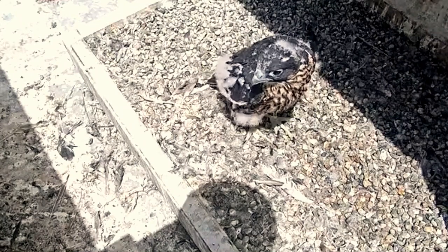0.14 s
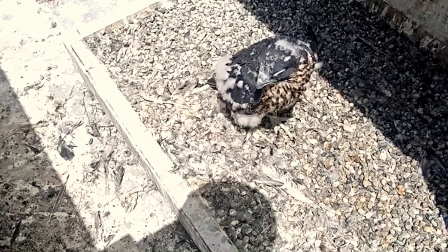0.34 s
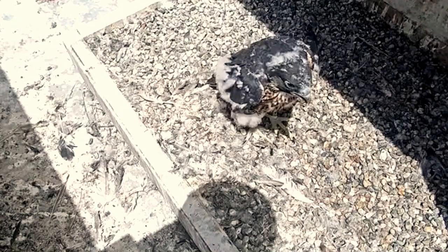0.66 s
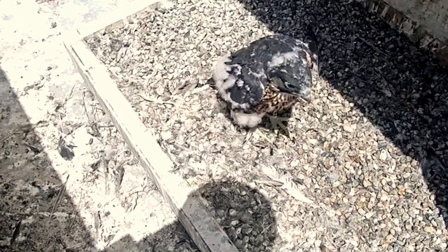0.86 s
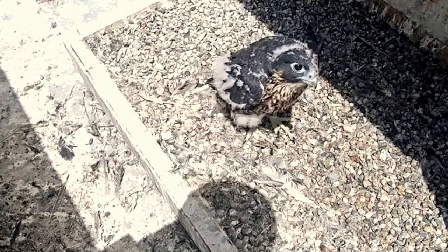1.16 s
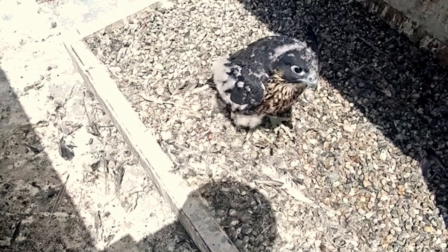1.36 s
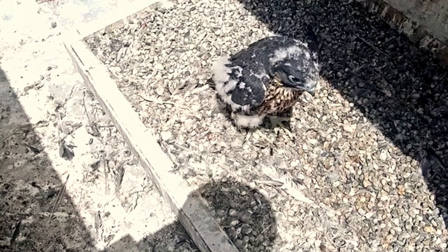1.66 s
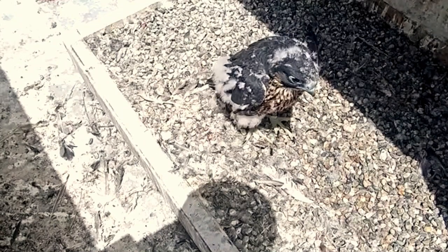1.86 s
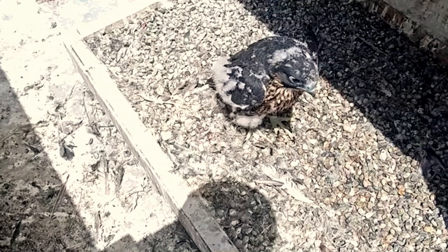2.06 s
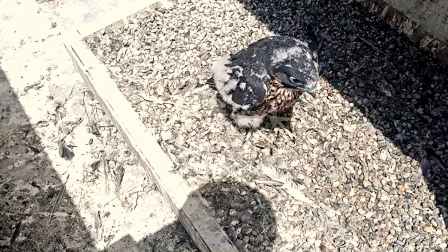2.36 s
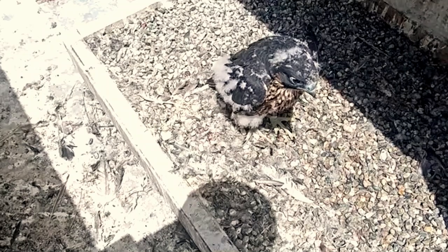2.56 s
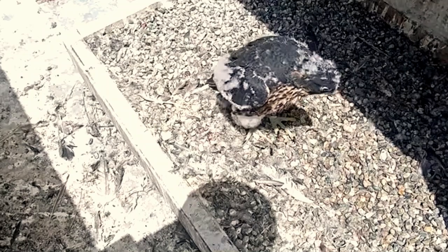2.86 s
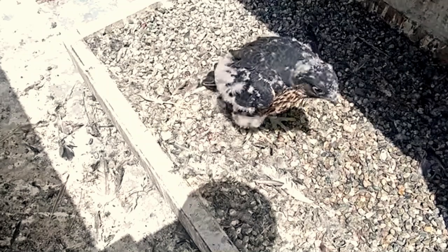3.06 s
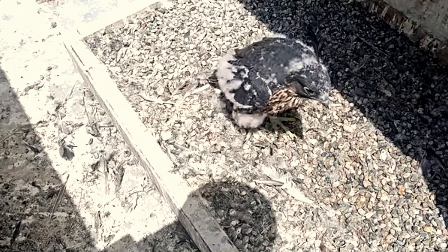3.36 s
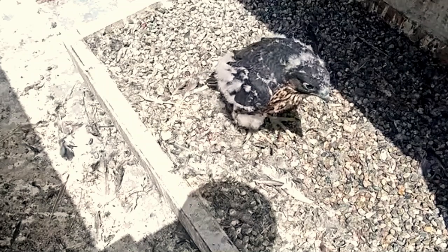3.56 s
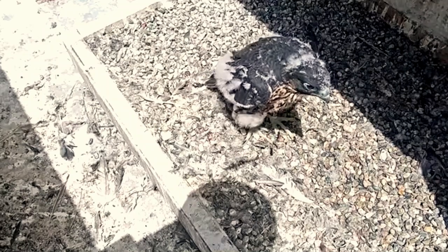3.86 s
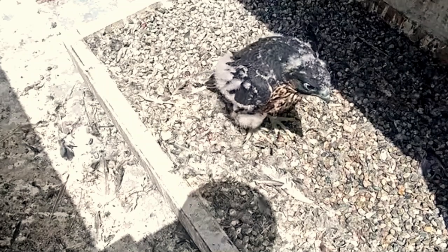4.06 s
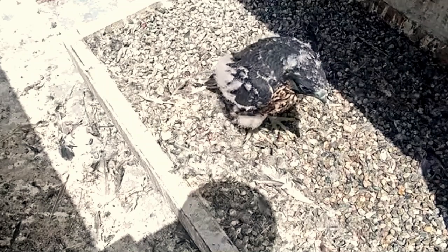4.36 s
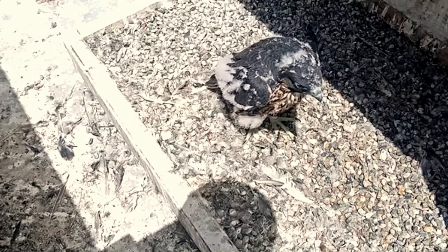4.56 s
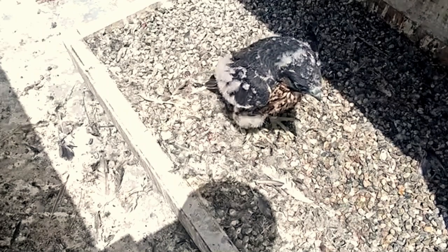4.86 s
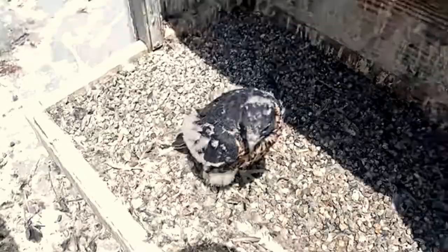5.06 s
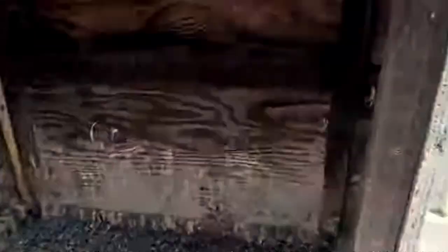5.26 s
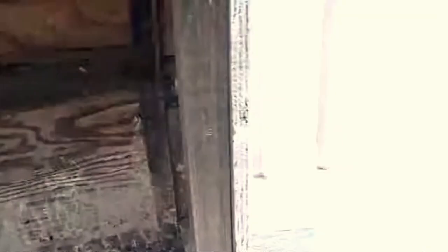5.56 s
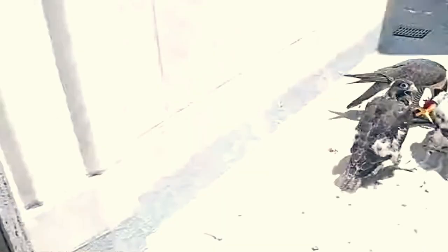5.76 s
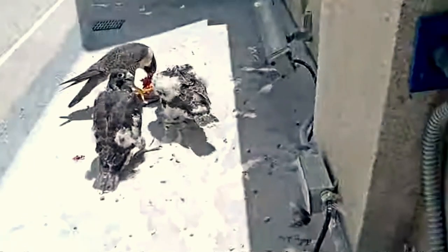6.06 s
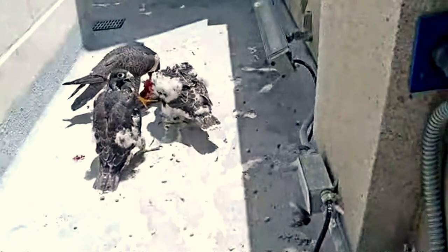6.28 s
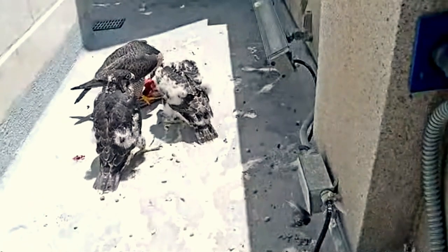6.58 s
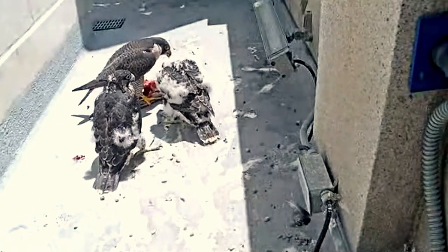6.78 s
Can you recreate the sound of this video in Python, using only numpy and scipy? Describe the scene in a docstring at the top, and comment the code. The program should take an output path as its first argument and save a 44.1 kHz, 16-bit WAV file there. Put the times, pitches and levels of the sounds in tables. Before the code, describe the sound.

Two falcon chicks on a walled rooftop ledge beg with harsh, shaky, raspy screams. The end of one cry opens the sound, and a long one swells from 0.1 to 0.9 s, joined by the second, slightly lower chick at 0.3. Further overlapping cries of about half a second follow from 0.9 to 2.3, then one alone until 3.0. Both scream from about 3.1; the lower bird carries on through 3.7-4.3, and shorter cries crowd together until 5.03. Sound drops to complete silence from about 5.07 to 5.55 s. Both burst back in, crying to 6.1; the lower continues, and the higher rejoins at 6.4 until both finish near 6.85. Each cry scoops upward, swells and falls. Quiet low air rumble rises and dips beneath. Short wall reflections, mono camera sound, patchy noise suppression and gritty mirrored treble.

```python
"""Rooftop ledge: two falcon chicks beg in long, hoarse, overlapping screams. Each cry is a shaky harmonic tone
plus throat-coloured noise; it scoops up, swells, holds and breaks downward. Close walls add a short noise tail;
rumble and drone of air, two shaped noises, rise and dip in level. The mono camera's noise suppressor tears
faint parts into patches; it skips samples, which mirrors the cries into the treble. The sound drops out for
half a second."""
import sys
import numpy as np
from scipy import signal
from scipy.fft import rfft, irfft
from scipy.io import wavfile
from scipy.ndimage import map_coordinates

SR = 44100
rng = np.random.default_rng(int(sys.argv[2]) if len(sys.argv) > 2 else 0)


def unload_wav(signal):
    """Save mono or channel-first audio to the path in sys.argv[1] as 16-bit WAV at rate SR, clipped to [-1, 1]."""
    wavfile.write(
        sys.argv[1],
        SR,
        np.round(np.clip(np.atleast_2d(signal).T, -1, 1) * 32767).astype(np.int16),
    )


N = 305172
TIME = np.arange(N) / SR

# air before level changes and suppressor; random buffeting is an rms swing
DEEP_DB, DRONE_DB = -56.5, -57.5
BUFFET_HZ, BUFFET_DB = 9.2, 1.35

# shared by all cries
SCOOP_S, SAG_S = 0.11, 0.055  # time constants: climb to pitch, drop at the end
ONSET_S, FALL_DB = 0.012, 20  # gate ramp; loss over the fall
PUSH_BEFORE_END_S, PUSH_S = 0.057, 0.044  # place and 1/e half-width of the last push
TONE_LAG_SHARE = 0.23  # tone starts weaker than rasp by this share of the swell
BREAK_JITTER = 1.5  # jitter at the end / held jitter
BEAK_STEEPNESS = 9.95  # rasp falls with this power of f above its upper edge

CONVERTER_HZ, TOP_HZ = 48000, 15800


def undb(db):
    """Decibels to amplitude gain."""
    return 10 ** (np.asarray(db) / 20)


def unit(x):
    """Scale to rms 1."""
    return x / np.sqrt(np.mean(x ** 2))


def bump(t, centre, width):
    """Bell of height 1, 1/e half-width as given."""
    return np.exp(-((t - centre) / width) ** 2)


def coloured(points):
    """Noise of rms 1 with a spectrum of (f/Hz, level/dB) points, falling away beyond both ends."""
    hz, db = np.transpose(points)
    f = np.maximum(np.fft.rfftfreq(N, 1 / SR), 1)
    low_skirt = np.minimum(f / hz[0], 1) ** 2
    high_skirt = np.minimum(hz[-1] / f, 1) ** 2
    gain = undb(np.interp(np.log(f), np.log(hz), db)) * low_skirt * high_skirt
    return unit(irfft(rfft(rng.standard_normal(N)) * gain, N))


def wobble(hz):
    """Random unsteadiness of rms 1, low-passed at hz."""
    lowpass = signal.butter(2, hz, fs=SR, output="sos")
    return unit(signal.sosfilt(lowpass, rng.standard_normal(N)))


def rumble():
    """Air over the roof: deep and upper noise buffet separately, with set rises and dips in level."""
    # deep air noise: f/Hz, level/dB
    deep_colour = [(20, -27), (32, -17.5), (48, -14), (65, -1), (92, 0), (130, -1.5), (180, -17)]
    # upper drone: f/Hz, level/dB
    drone_colour = [(120, -6.5), (170, 4), (250, 1.5), (310, -5), (400, -12), (560, -41), (1000, -18),
                    (2000, -18.5)]
    # rises and dips of the rumble, some likely the noise suppressor's:
    # t/s, 1/e half-width/s, deep change/dB, drone change/dB
    level_changes = [ (.52, 0.075, -35, -7.5), (.83, 0.16, 5, 1.5), (1.11, .04, -18, -13),
                     (1.22, 0.11, 3, -8.5), (1.73, 0.1, 6.5, -1), (2.02, 0.021, 10, 7),
                     (2.22, 0.042, 5.5, 3), (3.078, 0.058, 12, 4.5), (3.26, 0.051, 10, 0.5),
                     (3.8, .12, 5.5, -1.5), (4.048, 0.041, 12, 2), (4.559, 0.04, -6, -33),
                     (4.85, 0.47, 4, 2), (5.9, 0.083, -0.5, 1.5), (6.6, 0.21, -0.5, -2), ]
    deep_db = DEEP_DB + BUFFET_DB * wobble(BUFFET_HZ)
    drone_db = DRONE_DB + BUFFET_DB * wobble(BUFFET_HZ)
    for centre_s, width_s, deep_change_db, drone_change_db in level_changes:
        change = bump(TIME, centre_s, width_s)
        deep_db = deep_db + deep_change_db * change
        drone_db = drone_db + drone_change_db * change
    deep = coloured(deep_colour) * undb(deep_db)
    drone = coloured(drone_colour) * undb(drone_db)
    return deep + drone


def ledge(x, wet_db, t60_s):
    """Close walls add a short, dense patter of reflections: exponentially decaying noise after 3 ms."""
    t = TIME[:SR // 2]
    decay = np.exp(-np.log(1000) * t / t60_s)
    tail = rng.standard_normal(len(t)) * decay * (t > 0.003)
    echoes = signal.fftconvolve(x, tail / np.linalg.norm(tail))[:N]
    return x + undb(wet_db) * echoes


def rasp(source, edge_hz):
    """The hoarse part leaves through the beak, whose opening sets the upper edge."""
    f, t, frames = signal.stft(source, SR, nperseg=512)
    edge = np.interp(t, TIME[:len(source)], edge_hz)
    beak = 1 / (1 + (f[:, None] / edge) ** BEAK_STEEPNESS)
    return signal.istft(frames * beak, SR)[1][:len(source)]


def effort(t, start, end, rise, fall, swell_db, push_db):
    """Strength of one cry: it swells, holds, gives a last push and falls away."""
    rising = np.clip(1 - (t - start) / rise, 0, 1)
    falling = np.clip(1 - (end - t) / fall, 0, 1)
    push = bump(t, end - PUSH_BEFORE_END_S, PUSH_S)
    gate = np.clip(np.minimum(t - start, end - t) / ONSET_S, 0, 1)
    return gate * undb(push_db * push - swell_db * rising - FALL_DB * falling)


def chick(cries, gain_db, rasp_gain_db, onset_rasp_db, shake_hz, onset_jitter, scatter, wander,
          flutter_db, edge_hz, sputter_hz, sputter_db):
    """Uneven syrinx vibration shakes pitch and strength, smearing harmonics; chaotic vibration adds the rasp."""
    # throat colour of the rasp: f/Hz, level/dB
    throat = [(900, -26.5), (1250, -13.5), (1650, -17), (2000, -8.5), (2300, -7), (2550, -2), (3100, 0),
              (3700, 2), (4400, 2.5), (5300, 3.5)]
    out = np.zeros(N)
    shake, grit, drift = wobble(shake_hz), wobble(700), wobble(27.06)
    flutter = unit(wobble(100) + wobble(48))
    sputter = coloured(throat) * unit(undb(sputter_db * wobble(sputter_hz)))
    for (start, end, rise, fall, pitch, scoop, sag, second_db, swell_db, push_db,
         first_db, third_db, fourth_db, jitter_percent, rasp_db, beak_hz) in cries:
        on = (TIME >= start) & (TIME <= end)
        t = TIME[on]
        # pitch and beak open and close together
        opening = np.exp((start - t) / SCOOP_S)
        closing = np.exp((t - end) / SAG_S)
        arch = 1 - scoop * opening - sag * closing
        hz = pitch * arch
        # shaking widens the lines, scatter gives them skirts, slow drift bends them
        shaking = jitter_percent / 100 * onset_jitter ** opening * BREAK_JITTER ** closing
        unsteady = shaking * shake[on] + scatter * grit[on] + wander * drift[on]
        phase = 2 * np.pi * np.cumsum(hz * (1 + unsteady)) / SR
        # throat shuts out the 4th harmonic above its upper edge
        shut_db = 10 * np.log10(1 + (4 * hz / edge_hz) ** 60)
        harmonics_db = [first_db, 0, third_db, fourth_db - shut_db]
        tone = sum(undb(h) * np.sin(k * phase) for k, h in enumerate(harmonics_db, 1))
        # for a positive swell, the tone comes through later than the rasp
        tone_db = second_db + gain_db - TONE_LAG_SHARE * swell_db * opening
        voice = np.sqrt(2) * tone * undb(tone_db)
        hoarse_db = rasp_db + rasp_gain_db + onset_rasp_db * opening
        hoarse = rasp(sputter[on], beak_hz * arch) * undb(hoarse_db)
        strength = undb(flutter_db * flutter[on]) * effort(t, start, end, rise, fall, swell_db, push_db)
        out[on] += (voice + hoarse) * strength
    return out


def scene():
    """Both chicks off the walls, plus the rumble, at one microphone."""
    # higher chick, one row per cry; levels precede the chick's gains and effort: start/s, end/s, rise/s,
    # fall/s, held pitch/Hz, scoop/share of pitch, sag/share of pitch, 2nd harmonic/dB, swell/dB,
    # last push/dB, then 1st, 3rd, 4th harmonic re 2nd/dB, held rms jitter/%, rasp/dB, rasp upper edge/Hz
    high_cries = [ (-.1, .09, 0.045, 0.027, 1333, 0.015, 0.088, -39.5, 3, -2.5, -13.5, -6, -22, 3.3, -36.5, 4140),
                  (.095, .88, 0.52, 0.025, 1424, .06, .16, -41.5, 8, -6.5, -35, -20, -20, 2.48, -40.5, 4210),
                  (.93, 1.55, .34, .17, 1411, 0.098, 0.048, -46, 6, 2.5, -27, -20, -45, 2, -46, 4360),
                  (1.56, 2.12, .08, 0.059, 1441, 0.13, 0.077, -46, 5.5, -1.5, -41, -20, -21.5, 2.35, -46, 4200),
                  (2.32, 2.975, .4, 0.11, 1350, 0.018, 0.13, -48, 6, 12.5, -13.5, -6, -22, 2.31, -42.5, 3810),
                  (3.05, 3.71, .22, 0.087, 1408, .04, 0.015, -47.5, 13.5, -1.5, -38, -12.5, -41, 3.5, -46, 4130),
                  (4.32, 4.67, .04, 0.068, 1446, 0.047, 0.039, -46, -4, -3, -25.5, -13, -30, 1.88, -47, 3940),
                  (4.74, 5.035, 0.11, 0.027, 1404, .02, 0.013, -48.5, 14, 3.5, -28.5, -25, -32, 2.1, -47.5, 3520),
                  (5.565, 6.1, .22, 0.11, 1381, 0.019, 0.31, -51.5, 1, 9, -23.5, -25, -26, 2.73, -45, 4000),
                  (6.42, 6.845, .2, 0.057, 1395, 0.047, 0.035, -51.5, 14, 1, -11.5, -3.5, -32, 2.25, -44, 3940),
                  ]
    # lower, shriller chick: same columns and units
    low_cries = [ (.27, .88, 0.5, 0.023, 1298, 0.13, 0.0767, -49, 6, 2, -12, -4.5, -13, 2.7, -45.5, 3820),
                 (1.02, 1.545, 0.28, 0.11, 1231, .02, 0.054, -61, 8.5, 7.5, -4.5, 9.5, -3, 2.48, -45, 3630),
                 (1.77, 2.34, 0.25, 0.021, 1332, 0.011, 0.052, -57, 6.7, 2, -5, 0, -9, 1.94, -47, 3820),
                 (3.12, 3.65, 0.7, 0.086, 1238, .01, 0.017, -50.5, 15.4, 5, -6.5, 2.5, -8.5, 1.54, -40.5, 3970),
                 (3.62, 3.995, 0.1, .14, 1260, .01, 0.098, -60, 4.3, 13.5, -12, -19, -15, 3.15, -48, 4350),
                 (3.97, 4.39, 0.26, 0.08, 1264, 0.054, 0.011, -52.5, 5, 0.5, -14.5, 0, -7.5, 1.86, -45.5, 3820),
                 (4.38, 4.66, 0.17, 0.031, 1287, 0.0088, .01, -65, 4.3, 7.5, -3, 2, -1, 1.93, -49.5, 3400),
                 (4.65, 5.03, 0.15, 0.043, 1243, .01, 0.022, -51, 8.7, -2, -15.5, 4.5, -28, 2.42, -47, 3530),
                 (5.555, 6.04, 0.35, 0.16, 1170, 0.00985, 0.012, -51.5, 9.8, -1, -12, 9, -11.5, 1.22, -45, 3249),
                 (6.095, 6.63, 0.44, 0.054, 1179, .08, .01, -51.5, 15.4, -3.5, -11.5, 7.5, -8, 1.58, -40.5, 3250),
                 (6.57, 6.855, 0.09, 0.065, 1228, 0.032, .03, -60, 3.1, 3.5, -6.5, 10, -10, 2.02, -57.5, 3600),
                 ]
    high = chick(high_cries, gain_db=-3.5, rasp_gain_db=0.0, onset_rasp_db=3, shake_hz=110.5,
                 onset_jitter=0.55, scatter=0.013, wander=0.0025, flutter_db=2.38,
                 edge_hz=5500, sputter_hz=169, sputter_db=2.0)
    low = chick(low_cries, gain_db=-0.3, rasp_gain_db=2.0, onset_rasp_db=4.5, shake_hz=109.3,
                onset_jitter=1.803, scatter=0.0074, wander=0.00293, flutter_db=2.0,
                edge_hz=4900, sputter_hz=170, sputter_db=1.6)
    mono = ledge(high + low, wet_db=-4.5, t60_s=0.21) + rumble()
    return np.array([mono, mono])


def suppress(x, depth_db, size=2048):
    """Noise suppressor: narrow bands are turned down whenever they sink towards the noise floor."""
    # level taken for background noise: f/Hz, density/(dB per Hz)
    noise_floor = [(30, -99), (90, -73.5), (250, -78.5), (500, -91), (1300, -87.5), (2000, -86.5),
                   (4500, -89)]
    f, t, frames = signal.stft(x, SR, nperseg=size, scaling="psd")
    hz, db = np.transpose(noise_floor)
    floor = undb(np.interp(np.log(f + 1), np.log(hz), db))[:, None]
    above = (np.sqrt(2) * np.abs(frames) / floor) ** 4  # sqrt 2: one-sided density
    gain = np.maximum(above / (1 + above), undb(depth_db))
    return signal.istft(frames * gain, SR, scaling="psd")[1][..., :N]


def record(dry):
    """Camera: suppresses noise, skips converter samples without smoothing, cuts the top; the sound also drops
    out for half a second."""
    # silent span: start/s, end/s
    mute = (5.068, 5.55)
    outside_s = np.maximum(mute[0] - TIME, TIME - mute[1])
    live = np.clip(outside_s / 0.039, 0, 1) ** 2
    ends = np.clip(np.minimum(TIME, TIME[-1] - TIME) / 0.003, 0, 1)
    cleaned = suppress(dry, depth_db=-15) * live * ends
    # taking the last converter sample: sawtooth timing error, mirrors lines around multiples of 3.9 kHz
    taken = np.floor(TIME * CONVERTER_HZ + 1e-6) * SR / CONVERTER_HZ
    thinned = np.array([map_coordinates(channel, [taken], order=5, mode="nearest") for channel in cleaned])
    lowpass = signal.ellip(10, 0.2, 70, TOP_HZ, fs=SR, output="sos")
    return signal.sosfilt(lowpass, thinned)


dry = scene()
out = record(dry)
unload_wav(out)
```